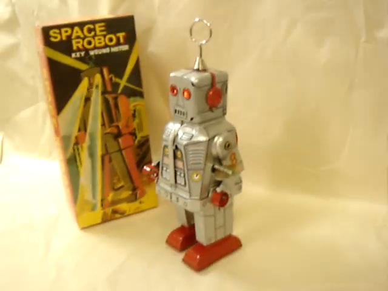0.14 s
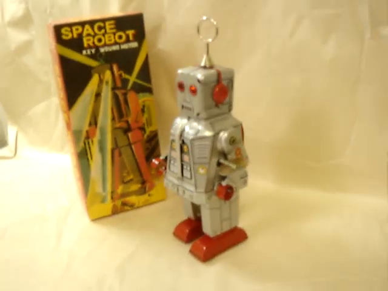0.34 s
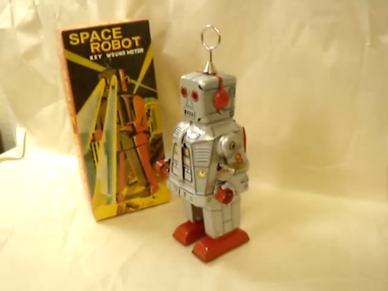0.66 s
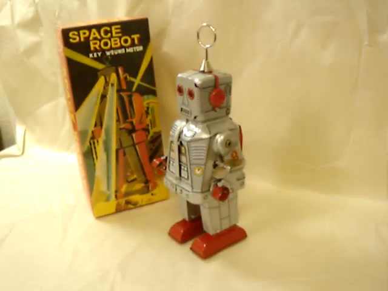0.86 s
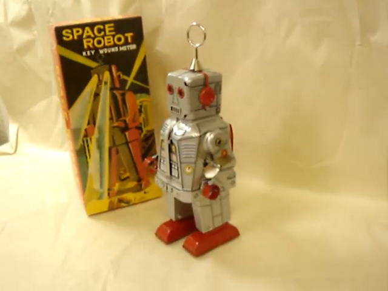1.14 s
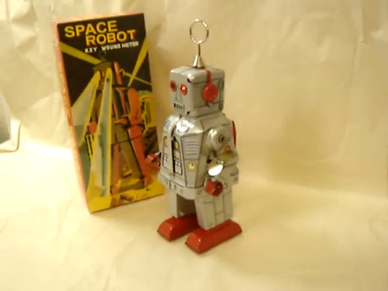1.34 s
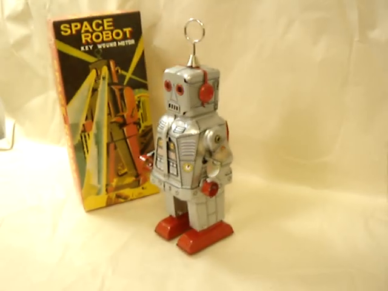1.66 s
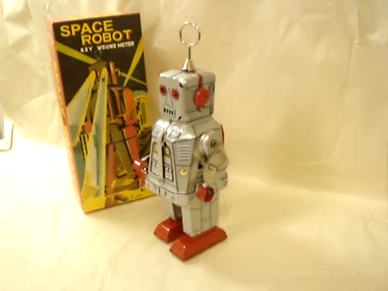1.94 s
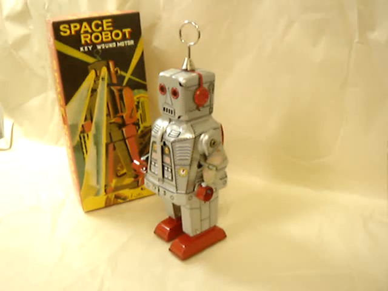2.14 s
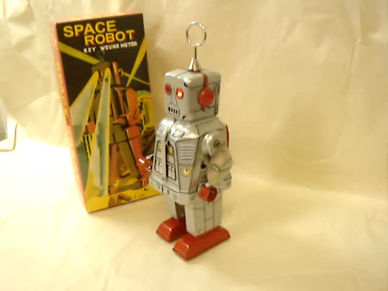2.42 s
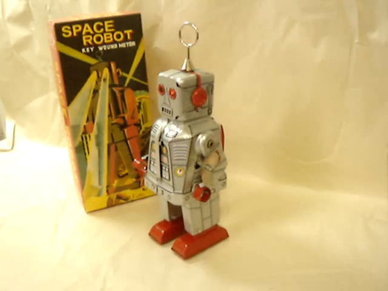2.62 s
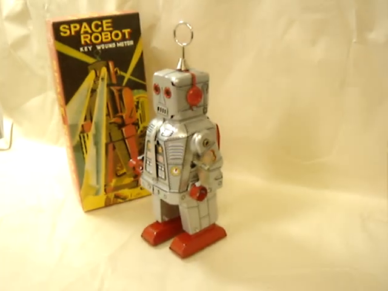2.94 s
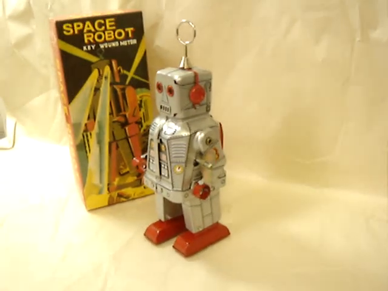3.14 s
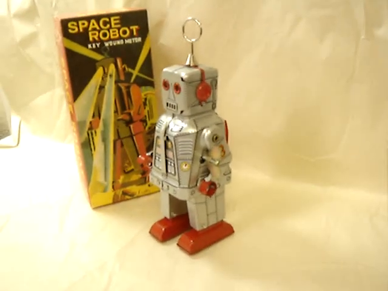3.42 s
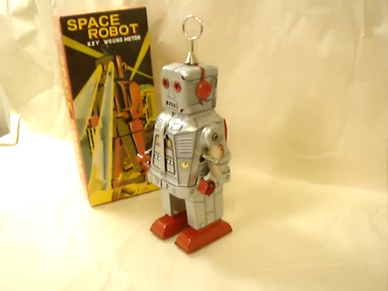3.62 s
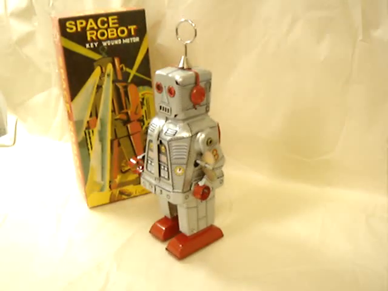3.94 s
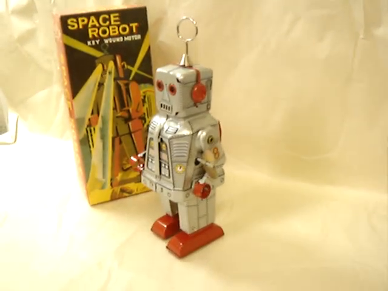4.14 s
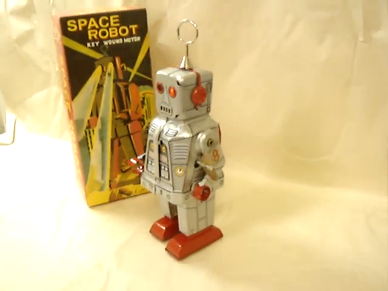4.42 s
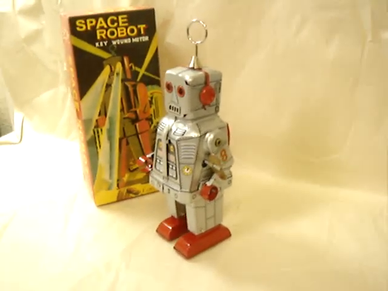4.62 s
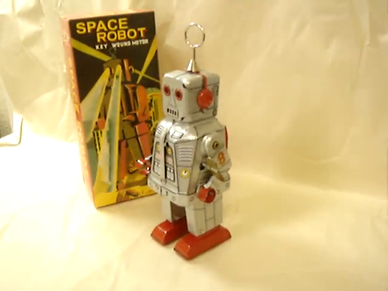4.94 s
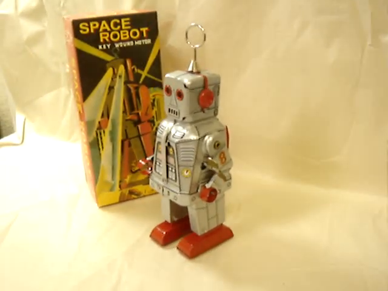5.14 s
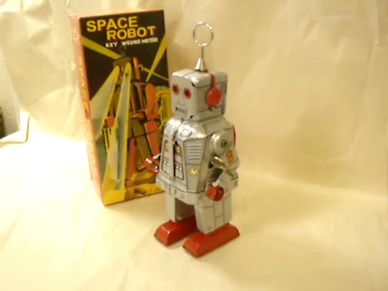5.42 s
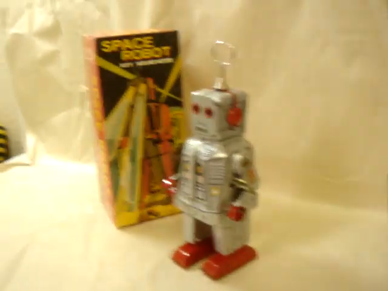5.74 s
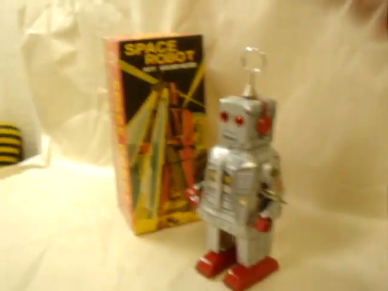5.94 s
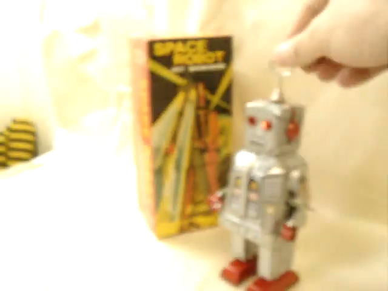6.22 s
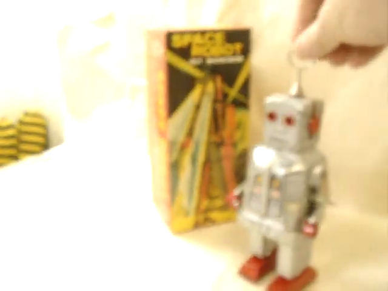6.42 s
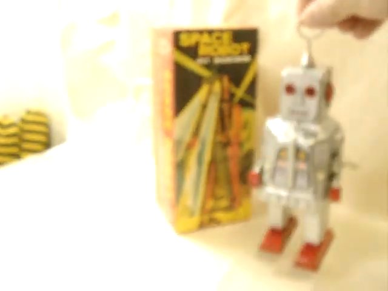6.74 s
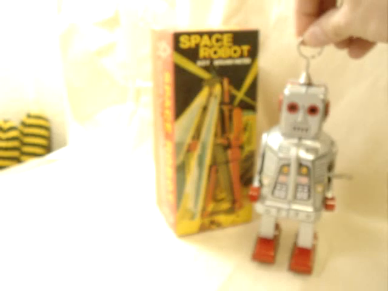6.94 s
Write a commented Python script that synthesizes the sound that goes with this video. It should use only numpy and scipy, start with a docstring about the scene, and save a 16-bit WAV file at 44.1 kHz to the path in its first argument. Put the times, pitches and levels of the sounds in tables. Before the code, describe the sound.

Close to the microphone in a small room, a clockwork tin toy runs with a dense, bright, mechanical rattle from start to finish. Its gear chatter wavers in speed while the linkage knocks rapidly, some knocks ringing the hollow shell and jingling the loose key. A faint low drone comes through the table. Late on, the mechanism slows slightly and the key jingles more; then the toy is lifted and the drone recedes while the rattle continues.

```python
"""Clockwork tin robot on a table.

One microphone, close by in a small room: the toy shuffles over the table and is then lifted by its aerial.
Gear teeth chatter at the pace of a spinning governor; the linkage knocks about thirty times a second.
Both ring the hollow tin shell, whose loose panels buzz in turn as the toy shifts its weight."""
import numpy as np
from scipy import signal
from scipy.fft import irfft
from scipy.ndimage import uniform_filter1d
import sys
import numpy as np
from scipy import signal
from scipy.fft import irfft
from scipy.io import wavfile
from scipy.ndimage import uniform_filter1d

SR = 44100
rng = np.random.default_rng(int(sys.argv[2]) if len(sys.argv) > 2 else 0)


def unload_audio(sound):
    """Save the sound as a 16-bit wav file, at the path given as the first command line argument."""
    columns = np.transpose(np.atleast_2d(sound))
    # keep every value between -1 and 1, then stretch to whole-number steps
    steps = np.round(np.clip(columns, -1, 1) * 32767)
    wavfile.write(sys.argv[1], SR, steps.astype(np.int16))


N = 312217
TIME = np.arange(N) / SR
HZ = np.fft.rfftfreq(8192, 1 / SR)

# The linkage's hardest knocks. Each row: time in seconds, then knock, key ping and clank in relative dB.
HARD_KNOCKS = [(0.146, -25.5, -33, -20.5), (0.1877, -17, -36, -32), (0.2885, -19.5, -43.7, -27),
               (0.5745, -21.5, -45, -22.5), (0.6107, -34, -34, -37), (0.73, -20.5, -45.6, -49),
               (0.9668, -19, -36, -29), (1.082, -22, -39, -27.5), (1.504, -21, -26, -33),
               (1.614, -19.5, -35, -29), (1.7268, -24, -28, -49), (1.793, -21.5, -36, -25),
               (1.9114, -19, -38, -19.5), (2.1072, -19, -35.2, -20), (2.134, -17.5, -33, -48),
               (2.2573, -21, -41, -19.5), (2.417, -18, -41, -30), (2.6397, -19, -41.8, -33),
               (2.801, -22, -30, -38), (2.895, -21.5, -34, -27.5), (2.927, -21, -43, -49),
               (2.975, -17.5, -43, -31), (3.0106, -18, -43, -24.5), (3.066, -22, -35, -36),
               (3.2664, -15.5, -44.3, -48), (3.3171, -19, -47, -19), (3.421, -17.5, -44, -20.5),
               (3.514, -16.5, -35.7, -30), (3.544, -20.5, -38, -30), (3.605, -20, -45, -22),
               (3.6724, -22.5, -33, -23.5), (3.7084, -24, -31, -24), (3.7542, -21.5, -35, -25.5),
               (3.904, -23, -38, -22), (3.941, -19, -40, -19), (4.077, -19, -30, -33),
               (4.109, -22, -31, -46), (4.168, -31, -40, -28), (4.2256, -19, -34, -21),
               (4.277, -19.5, -31, -26), (4.49, -21, -35, -24), (4.588, -24, -33, -23.5),
               (4.7058, -21.5, -43, -23), (4.7323, -19, -47, -44), (4.9601, -20.5, -36, -28),
               (5.0308, -23.5, -37, -33), (5.1543, -21, -46.3, -25), (5.1807, -20.5, -49, -26),
               (5.3371, -21, -38, -23), (5.4015, -20.5, -48, -40), (5.559, -23.5, -48, -41),
               (5.5973, -20.5, -36, -23), (5.6319, -23.5, -32, -26), (5.6829, -20.5, -27, -23),
               (5.7524, -20.5, -34, -22), (5.8033, -18, -37, -19.5), (5.8269, -23, -34, -23),
               (5.866, -25.5, -28, -25), (5.9006, -23, -33, -29), (5.933, -21.5, -42, -44),
               (5.949, -24.5, -36, -40), (6.048, -26, -38, -22.5), (6.0797, -23, -27, -38),
               (6.15, -18, -48, -38.7), (6.191, -16, -45, -17.5), (6.299, -21.5, -42, -24),
               (6.3747, -23, -36, -24), (6.4794, -24.5, -37, -21), (6.514, -26, -31, -44),
               (6.5625, -16.5, -27, -35), (6.655, -21.5, -33, -32), (6.6801, -17, -35, -19),
               (6.794, -20.5, -32, -34), (6.8174, -18.5, -30, -37), (6.9074, -28.5, -29, -29),
               (6.991, -20.5, -35, -41), (7.063, -24.5, -47, -21)]
# The stances the toy holds. Each entry, by name: start and end in seconds.
STANCE_SPANS = {"setting off": (0, .44), "easing": (.5, .85), "striding": (.9, 1.57),
                "running": (1.87, 2.92), "shuffling": (2.97, 5.3), "turning": (5.72, 6.52),
                "lifted": (6.55, 7.1)}
# Modes of the hollow chest. Each row: pitch in Hz, width in Hz, relative level in dB.
CHEST_MODES = [(1178, 73.5, -3.5), (1228.2, 36, 0.5), (1263, 45, -7.5), (1331, 224, -11)]
# A flat foot changes the shaking passed to the table.
# Each row: centre and length in seconds, change of the hum in dB, change of the drone in dB.
FLAT_FEET = [(.2, 0.5, -10, 5), (1.077, 0.27, 12, 4.5), (1.398, 0.57, 11, -1), (1.976, 0.6, 6, 0.5),
             (2.577, 0.34, 12, -0.5), (3.802, 0.79, 6.5, 0.5), (4.899, 1, 5, -2.5), (6.101, 0.55, 7.5, 2.5)]


def amp(db):
    """Decibels to gain."""
    return 10 ** (np.asarray(db) / 20)


def unit_rms(x):
    """Scales to rms 1."""
    return x / np.sqrt(np.mean(x ** 2) + 1e-20)


def add(mix, s, sound):
    """Lays a sound into the mix at s seconds."""
    part = mix[max(round(s * SR), 0):][:len(sound)]
    part += sound[:len(part)]


def swells(rows):
    """Smooth humps, one for each (centre in seconds, length in seconds, height)."""
    out = np.zeros(N)
    for s, length, height in rows:
        add(out, s - length / 2, height * np.hanning(round(length * SR)))
    return out


def wander(per_s):
    """A random curve of about unit size."""
    draws = rng.standard_normal(SR // 20)
    return np.interp(TIME * per_s, np.arange(len(draws)), np.clip(draws, -2, 2))


def flutter(per_s, depth_db):
    """A gain that wanders at random, as a loose part presses more or less firmly."""
    return amp(depth_db * wander(per_s))


def spectrum(points):
    """Gain over frequency through (Hz, dB) points."""
    hz, db = np.transpose(points)
    return amp(np.interp(np.log(HZ + 1), np.log(hz), db))


def resonances(modes):
    """Gain over frequency of steep-sided resonances."""
    return np.sqrt(sum(amp(db) ** 2 / (1 + 2 * ((HZ - hz) / width) ** 2) ** 2 for hz, width, db in modes))


def ring(x, gain):
    """Passes x through a minimum-phase body with this spectral shape and unit energy."""
    log_gain = np.log(np.maximum(gain / gain.max(), 1e-5))
    mirrored = np.concatenate([log_gain, log_gain[-2:0:-1]])
    response = irfft(np.exp(np.conj(signal.hilbert(mirrored)))[:len(HZ)])
    return signal.oaconvolve(x, response / np.linalg.norm(response))[:N]


def impacts(per_s, spread_db):
    """Tiny contacts at random moments and of uneven size."""
    sizes = amp(spread_db * np.clip(rng.standard_normal(N), -2, 2)) * rng.choice([-1, 1], N)
    return unit_rms(sizes * (rng.random(N) < per_s / SR))


def gears(turns, chatter, knocks, teeth=4, slide_decay=0.59, slack_s=0.019):
    """Each pinion tooth strikes, then slides more quietly; knocks throw the gears slack for a moment."""
    tooth = (turns * teeth).astype(int)
    strikes = amp(3 * rng.standard_normal(tooth[-1] + 1))[tooth]
    mesh = unit_rms(strikes * np.exp(-(turns * teeth % 1) / slide_decay))
    mesh *= 1 + 0.16 * np.cos(2 * np.pi * turns)  # sways once each turn of the governor
    slack = np.zeros(N)
    for s, strength, _ in knocks:
        add(slack, s + 0.0092, strength * signal.windows.tukey(round(slack_s * SR), .5))
    slack_db = -1.5 * np.minimum(slack / chatter, 3)
    return amp(0.84 + slack_db) * chatter * mesh * impacts(per_s=7000, spread_db=2)


def walking_knocks(chatter, jitter_s=0.0054):
    """Lists knocks as (seconds, strength, key ping strength): soft ones keep the pace between hard ones."""
    # Pace of the linkage. Each row: time in seconds, knocks per second.
    pace = [(0, 29.5), (.8, 33), (1.3, 29.5), (2.3, 33), (3.2, 33.4), (3.8, 30.6), (4.8, 29), (5.3, 25.5),
            (7.08, 26.9)]
    # How freely the key jingles. Each entry, by stance: relative level of a soft knock's ping in dB.
    jingle_db = {"setting off": -16.5, "easing": -15, "striding": -15, "running": -16, "shuffling": -15.5,
                 "turning": -10.5, "lifted": -10}
    knocks = [(s, amp(db + 1.5), amp(ping_db)) for s, db, ping_db, _ in HARD_KNOCKS]
    marks = np.sort([0, *np.transpose(HARD_KNOCKS)[0], TIME[-1]])
    chance = rng.uniform(-1, 1, (len(marks), 40, 3))
    for start, end, draws in zip(marks, marks[1:], chance):
        beats = max(round((end - start) * np.interp(start, *np.transpose(pace))), 1)
        for s, (late, softer, jingle) in zip(np.linspace(start, end, beats + 1)[1:-1], draws):
            stance = next(name for name, (_, until) in STANCE_SPANS.items() if s < until)
            strength = chatter[int(s * SR)] * amp(-2.5 - 3 * softer)
            knocks.append((s + jitter_s * late, strength, strength * amp(jingle_db[stance] + 4 * jingle)))
    return knocks


def linkage(knocks, rise_s=0.0037, lead_s=0.0023):
    """Force of the knocks: the play in the joints closes over a few milliseconds, then the push fades."""
    t, force = np.arange(SR // 20) / SR, np.zeros(N)
    blow = (t / rise_s * np.exp(1 - t / rise_s)) ** 2
    for s, strength, _ in knocks:
        add(force, s - lead_s, strength * blow)
    return force


def clacks(knock_force, band_hz=(1500, 10000)):
    """Each knock is a burst of metal contacts; the light links have little body."""
    contacts = amp(2.5) * knock_force * impacts(per_s=22000, spread_db=0.5)
    return signal.lfilter(*signal.butter(1, band_hz, "bandpass", fs=SR), contacts)


def scatter(force, decay_s=0.0011, share=0.67, crest=3.68):
    """Each contact spreads through the thin sheet as dense ringing; the sheet yields under the sharpest."""
    pole = np.exp(-1 / (decay_s * SR))
    energy = signal.lfilter([1 - pole], [1, -pole], force ** 2)
    spread = np.sqrt(1 - share) * force + np.sqrt(share * energy) * rng.standard_normal(N)
    limit = crest * np.sqrt(abs(uniform_filter1d(energy, size=300)) + 1e-20)
    return limit * np.tanh(spread / limit)


def shell(force, fade_s=0.061):
    """The tin body rings all along; loose panels buzz and tick at their own pitch in each stance."""
    # Broad response of the shell. Each row: frequency in Hz, relative level in dB.
    response = [(150, -44.5), (450, -23), (750, -17), (920, -24), (1500, -8.5), (1850, -12.5), (2300, -6),
                (2600, -12), (3500, -2), (5300, -1.5), (7000, -4.5), (7750, -6), (8300, -13), (10000, -19)]
    # Its lasting modes. Each row: pitch in Hz, width in Hz, dB over the broad response.
    modes = [(495.5, 17, 5), (1419.5, 54, 11), (1620, 83, 6.5), (2875, 240, 1), (3035, 20, 9),
             (9370, 390, 7)]
    # Loose panels, by stance. Each row: pitch in Hz, width in Hz, relative level in dB.
    panels = {"setting off": [(2190, 130, -19), (3770, 260, -13), (4600, 230, -16), (5700, 190, -13.5)],
              "easing": [(2210, 120, -14.5), (3043, 30, -22), (3770, 260, -8.5)],
              "striding": [(2250, 170, -21.5), (3028, 20, -19.5), (3647, 100, -10.5), (3860, 110, -10.5),
              (5200, 170, -9.5), (5880, 120, -15.5)], "running": [(2256, 120, -18.5), (3037, 34, -22),
              (3609, 95.7, -15), (3890, 110, -15.5), (4650, 150, -10), (5220, 220, -10.8),
              (6267, 120, -12)], "shuffling": [(2230, 185, -21.5), (3427, 106, -19), (3795, 220, -16),
              (4646, 320, -11.5), (5320, 100, -16.5), (6254, 140, -15)], "turning": [(3030, 30, -24.5),
              (3989, 260, -9), (4460, 230, -17)], "lifted": [(3050, 45, -23), (3580, 130, -21),
              (6270, 340, -15)]}
    out = amp(-3) * ring(force, spectrum(response) * np.hypot(1, resonances(modes)))
    level = np.sqrt(abs(uniform_filter1d(force ** 2, size=100)))
    buzz = level * impacts(per_s=4500, spread_db=0)
    for stance, (start, end) in STANCE_SPANS.items():
        loose = np.clip(np.minimum(TIME - start, end - TIME) / fade_s + 1, 0, 1)
        for hz, width, db in panels[stance]:
            ticks = level * impacts(per_s=330, spread_db=0.5)
            panel = ring(amp(-1.1) * buzz + amp(-5.5) * ticks, resonances([(hz, width, 0)]))
            out += amp(db) * loose * flutter(per_s=28, depth_db=2) * panel
    fizz = ring(buzz, resonances([(8910, 1140, 0)]))
    return out + amp(-17 + 3.5 * wander(per_s=49)) * fizz  # a faint, flickering high hiss near 9 kHz


def chest_ring(shaking, stiffening=0.3):
    """The hollow chest rings on; its stiff sheet gives less the harder it swings, evening out the ring."""
    # Ring between clanks. Each row: time in seconds, relative level in dB.
    levels = [(0, -32), (.3, -33.5), (.75, -36), (1.1, -33), (1.7, -34), (1.95, -33.5), (2.55, -29.5),
              (2.9, -34), (3.45, -32), (3.8, -36.5), (4, -33.5), (4.7, -31.5), (5.3, -34), (5.8, -32.5),
              (6.45, -31), (6.6, -34), (7.08, -36.5)]
    ringing = ring(shaking, resonances(CHEST_MODES))
    swing = uniform_filter1d(abs(signal.hilbert(ringing)), size=200)
    evened = unit_rms(ringing / (swing + swing.mean() / 10) ** stiffening)
    return amp(np.interp(TIME, *np.transpose(levels)) - 1) * evened


def table_drone(shaking, level_db, low_cut_hz=60):
    """The table top drones as the feet shake it."""
    # Modes of the table top. Each row: pitch in Hz, width in Hz, relative level in dB.
    modes = [(165, 67, -5.5), (272, 30, 2.5), (325, 103, 1), (535, 51, -7), (736, 122, -5.5)]
    feet_db = swells([(s, length, db) for s, length, _, db in FLAT_FEET])
    return amp(level_db + feet_db) * ring(shaking, resonances(modes) * HZ / np.hypot(HZ, low_cut_hz))


def governor_hum(turns, level_db):
    """The unbalanced governor shakes the toy once a turn; the rocking feet pass it on in fits and starts."""
    feet_db = swells([(s, length, db) for s, length, db, _ in FLAT_FEET])
    phase = 2 * np.pi * (turns + 0.13 * wander(per_s=30))
    shake = amp(-3) * np.sin(phase) + amp(-12) * np.sin(2 * phase)
    return np.sqrt(2) * amp(level_db + feet_db) * flutter(per_s=22, depth_db=4) * shake


def room_air(level_db=-73):
    """The faint, low rush of a still room."""
    # Room tone. Each row: frequency in Hz, relative level in dB.
    tone = [(20, -0.5), (50, 2), (100, 2), (300, 4.5), (1000, -15.5), (10000, -18)]
    return amp(level_db) * ring(rng.standard_normal(N), spectrum(tone))


def room_echo(x, t60=0.1, patterns=16, reflections_per_s=2000):
    """Sparse reflections reach the microphone in a pattern that changes as the toy moves."""
    t, hop = np.arange(SR // 3) / SR, N // patterns + 1
    window = np.sin(np.pi * np.arange(2 * hop) / (2 * hop))
    padded, out = np.pad(x, (hop, 2 * hop)), np.zeros(N + hop)
    for start in range(0, N + hop, hop):
        taps = rng.choice([-1, 1], len(t)) * (rng.random(len(t)) < reflections_per_s / SR)
        taps = taps * (t > .003) * amp(-60 * t / t60)
        piece = padded[start:start + 2 * hop] * window
        add(out, start / SR, signal.fftconvolve(piece, taps / np.linalg.norm(taps)))
    return out[hop:]


def ping(hz, t60=0.024, rise_s=0.0063):
    """One struck mode of the tin."""
    t = np.arange(SR // 10) / SR
    envelope = (1 - np.exp(-t / rise_s)) * amp(-60 * t / t60)
    return envelope / envelope.max() * np.sin(2 * np.pi * hz * t)


def winding_key(knocks, hz=5280, detuning=0.009, bounce_s=0.018):
    """The loose winding key gives a short bright ping with each knock and bounces once, sooner or later."""
    out = np.zeros(N)
    chance = rng.uniform(-1, 1, (len(knocks), 3))
    for (s, _, strength), (first, second, late) in zip(knocks, chance):
        add(out, s - .0006, strength * amp(8.5) * ping(hz * (1 + detuning * first)))
        add(out, s + bounce_s * (1 + late / 2), strength * amp(-4.5) * ping(hz * (1 + detuning * second)))
    return out


def clanks(detuning=0.018, rise_s=0.0085, lead_s=0.00294):
    """Hard knocks swell the ring of the hollow chest: some hit it squarely, others only graze it."""
    t, out = np.arange(SR // 10) / SR, np.zeros(N)
    swell = (t / rise_s * np.exp(1 - t / rise_s)) ** 2
    for s, _, _, clank_db in HARD_KNOCKS:
        clank = np.zeros(len(t))
        for hz, _, db in CHEST_MODES:
            detune, phase = rng.uniform(-1, 1, 2)
            pitch = hz * (1 + detuning * detune)
            clank += amp(db) * swell * np.sin(2 * np.pi * pitch * (t - rise_s) + phase)
        add(out, s - lead_s, amp(clank_db) * clank / abs(clank).max())
    return out


def low_thuds(hz=60, decay_s=0.0054):
    """Faint, short low thuds with almost no ring."""
    # The thuds. Each row: start in seconds, relative level in dB.
    thuds = [(4.079, -55), (4.279, -60), (4.739, -52), (5.499, -59), (6.191, -64), (6.568, -61),
             (6.799, -57), (6.999, -61)]
    t, out = np.arange(SR // 10) / SR, np.zeros(N)
    for s, db in thuds:
        add(out, s, amp(db + 9) * np.sin(2 * np.pi * hz * t) * np.exp(-t / decay_s))
    return out


def scuff(hz=400, width_hz=450):
    """A short dull rub of a tin sole on the table."""
    # The one rub: centre in seconds, length in seconds, level in dB.
    rub = (5.585, .05, -49.5)
    s, length, db = rub
    friction = ring(impacts(per_s=2200, spread_db=5), resonances([(hz, width_hz, 0)]))
    return amp(db) * swells([(s, length, 1)]) * friction


def scene(usual_hz=133, run_down_db_per_s=0.3662, lift_at_s=6.47, lift_takes_s=0.27, frame_lead_s=0.001467):
    """One force drives shell, chest and table; the microphone also hears the room's echo and air."""
    # Speed of the governor. Each row: time in seconds, turns per second.
    governor = [(0, 125), (.2, 168.6), (.5, 119.4), (.8, 120.1), (1.05, 178.2), (1.22, 167.7), (1.4, 185.6),
                (1.52, 212.3), (1.64, 130.3), (1.85, 146.5), (2.03, 173.4), (2.28, 139.4), (2.58, 183.8),
                (2.8, 149.1), (3.2, 128.8), (3.65, 150.7), (3.92, 125.8), (4.07, 143.7), (4.15, 110.3),
                (4.55, 127.1), (5, 147.4), (5.2, 126.1), (5.32, 87.96), (5.7, 96.5), (5.88, 143),
                (6.2, 125.1), (6.55, 96.24), (7.08, 118.1)]
    # The legs take the weight and the gears go quiet. Each row: centre and length in seconds, dip in dB.
    strains = [(0.505, 0.055, -1), (0.57, 0.42, -2.5), (0.815, 0.23, -3.5), (1.835, 0.085, -1.5),
               (3.0, 0.29, -2), (3.292, 0.12, -2.5), (4.13, 0.083, -3.5), (4.35, 0.56, -2),
               (5.248, 0.19, -1), (6.235, 0.12, -1), (6.838, 0.04, -3.5)]
    speed = np.interp(TIME, *np.transpose(governor))
    turns, octaves = np.cumsum(speed) / SR, np.log2(speed / usual_hz)
    # The chatter gains 1 dB per doubling of speed; the spring weakens as it unwinds.
    effort_db = octaves - run_down_db_per_s * TIME + swells(strains)
    lifted_db = -6 * np.clip((TIME - lift_at_s) / lift_takes_s, 0, 1)  # the feet leave the table
    chatter = amp(-21 + effort_db)
    knocks = walking_knocks(chatter)
    knock_force = linkage(knocks)
    force = gears(turns, chatter, knocks) + clacks(knock_force)
    cushioned = force / np.hypot(chatter, 0.48 * knock_force)  # the legs soak up part of each knock
    shaking = np.roll(unit_rms(cushioned), -round(frame_lead_s * SR))  # the frame leads the loose parts
    chest = chest_ring(shaking) + clanks()
    table = table_drone(shaking, level_db=-51 + 2 * effort_db + lifted_db)
    toy = shell(scatter(force)) + chest + table + winding_key(knocks) + scuff()
    room = room_air() + amp(-11) * room_echo(toy)
    hum = governor_hum(turns, level_db=-65.5 + 4.5 * octaves + lifted_db)
    return (toy + room + hum + low_thuds())[None]


def record(dry, edge_hz=10170):
    """The recorder cuts the top treble steeply."""
    low_pass = signal.firwin(601, edge_hz, window=("kaiser", 9), fs=SR)
    return signal.oaconvolve(dry, low_pass[None], "same")


dry = scene()
out = record(dry)
unload_audio(out)
```